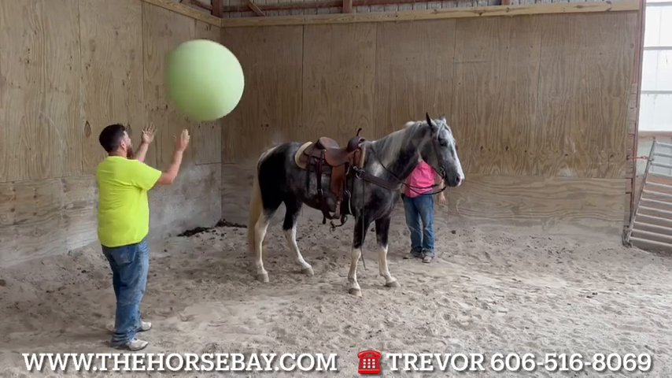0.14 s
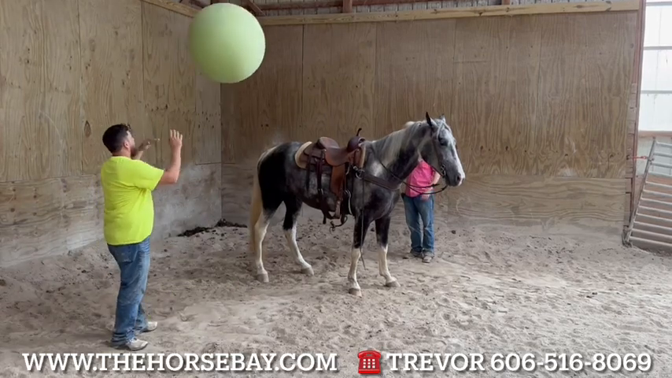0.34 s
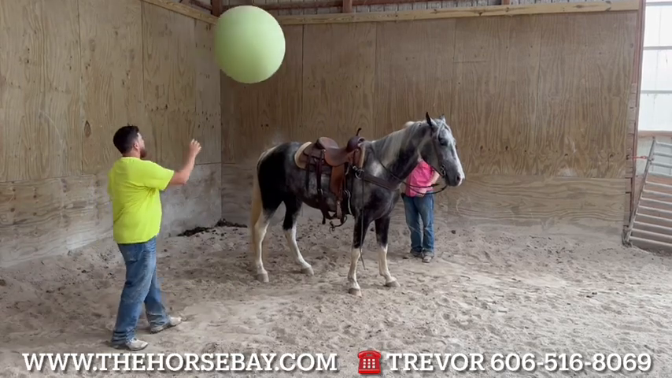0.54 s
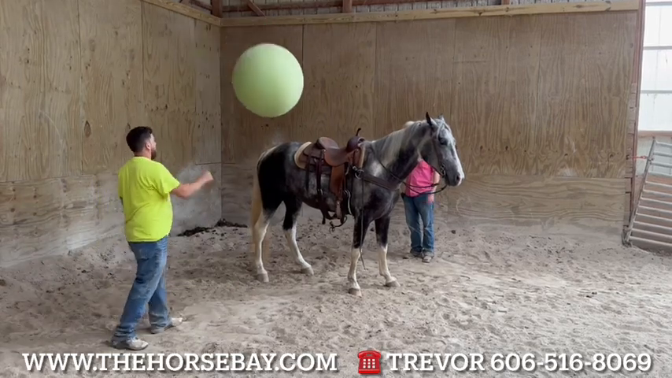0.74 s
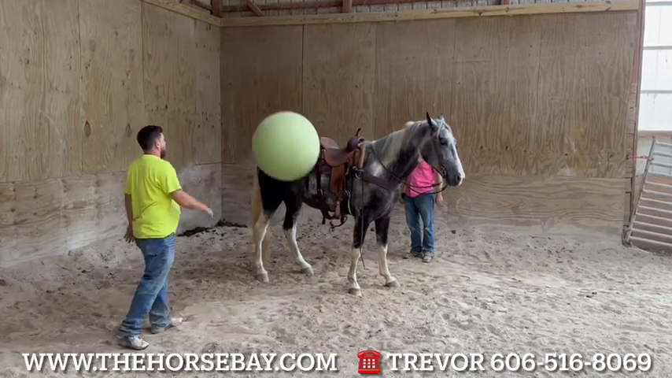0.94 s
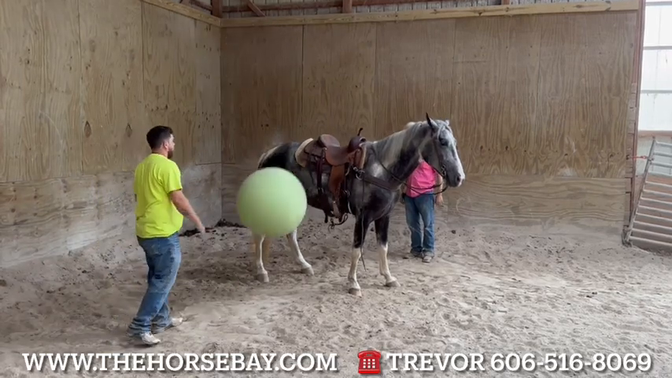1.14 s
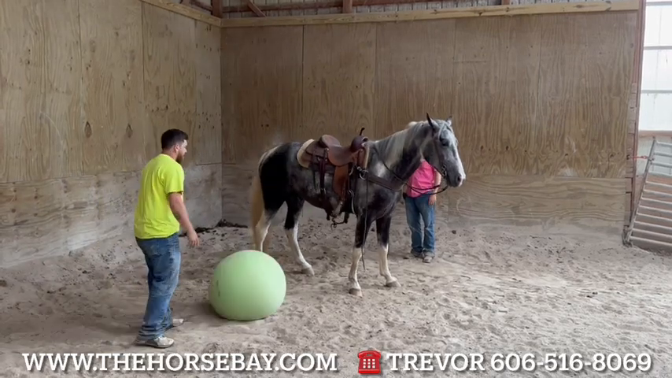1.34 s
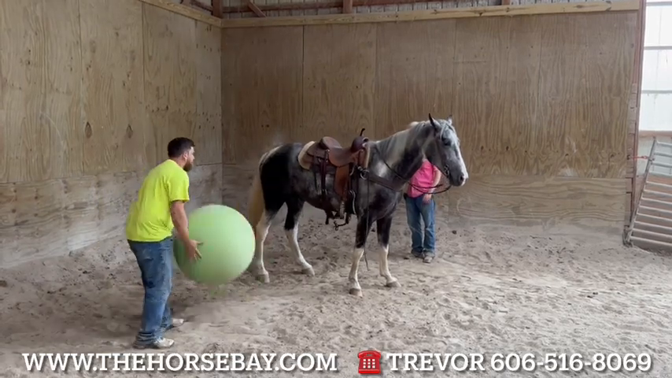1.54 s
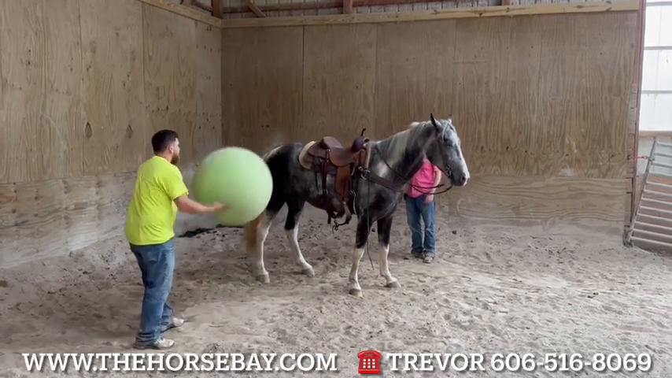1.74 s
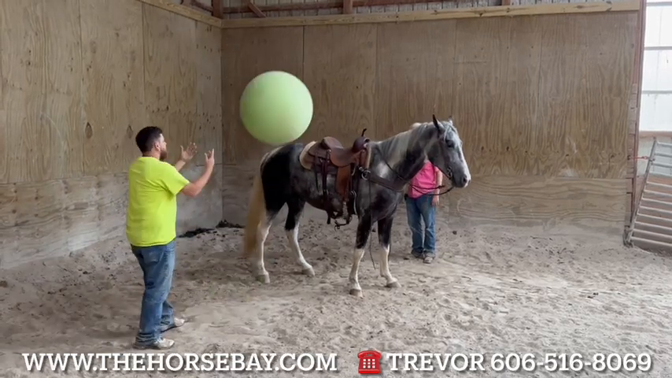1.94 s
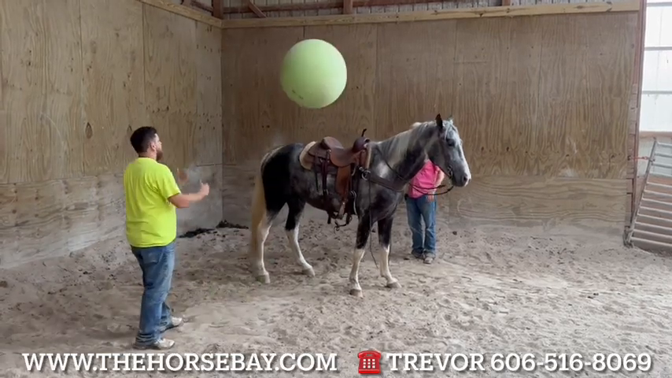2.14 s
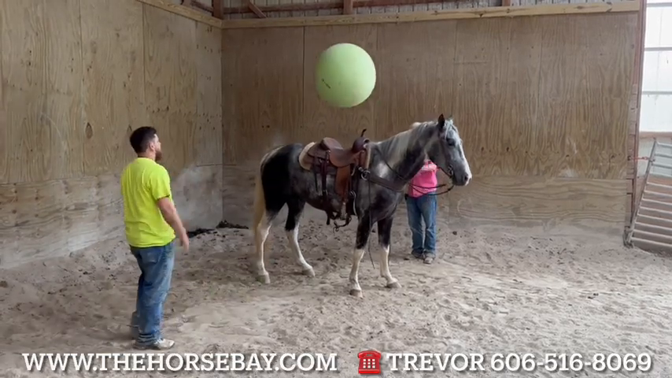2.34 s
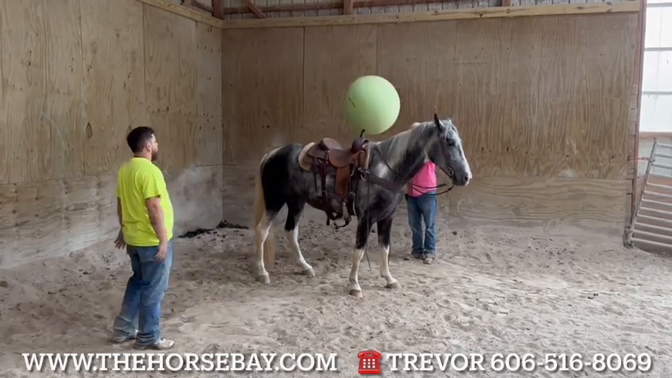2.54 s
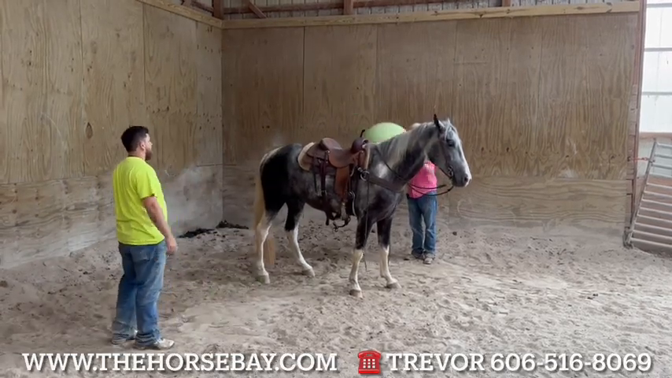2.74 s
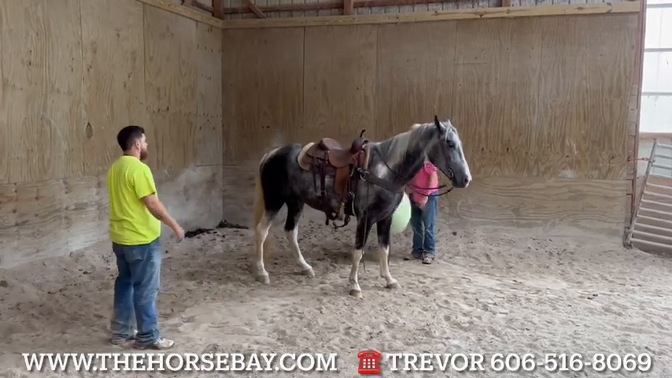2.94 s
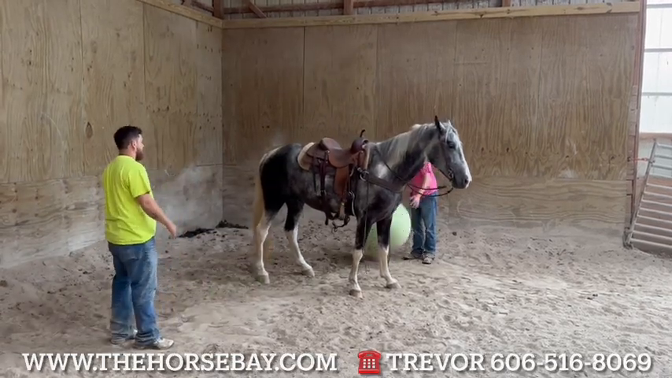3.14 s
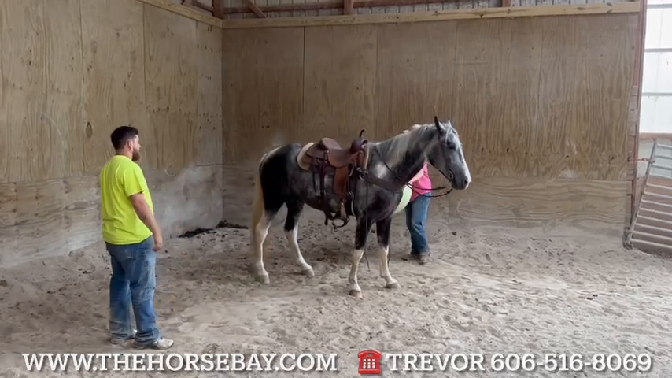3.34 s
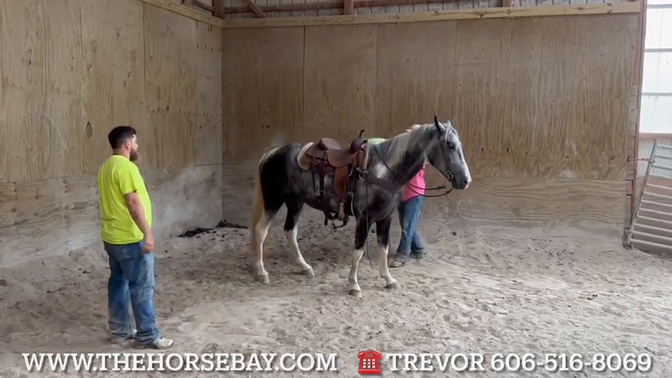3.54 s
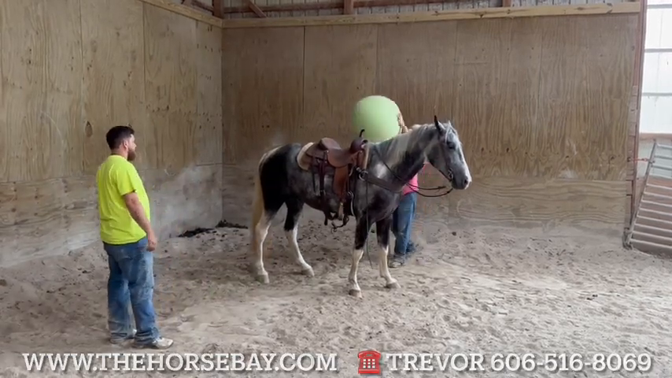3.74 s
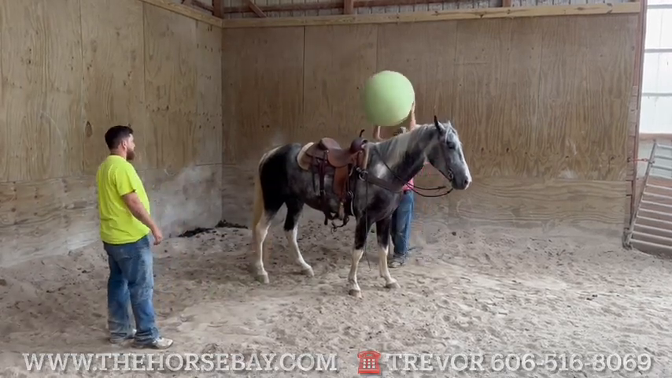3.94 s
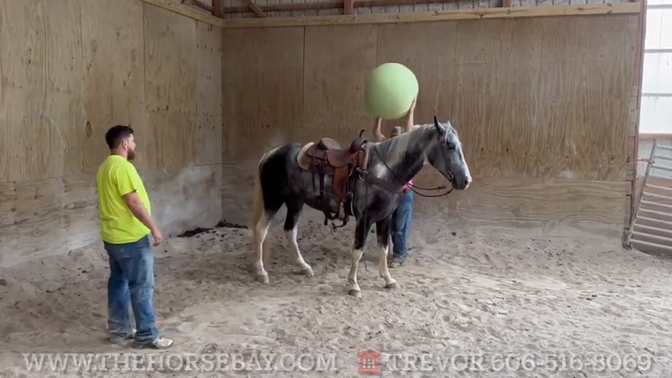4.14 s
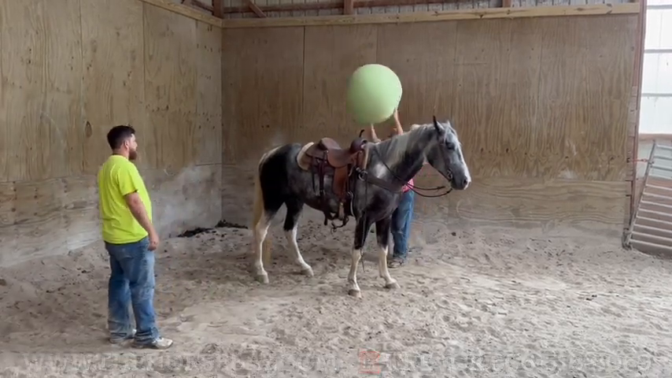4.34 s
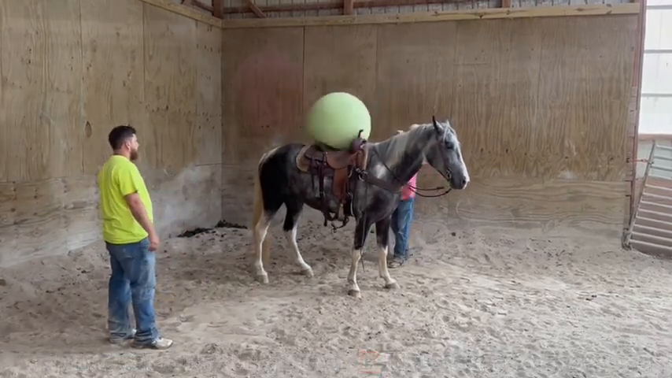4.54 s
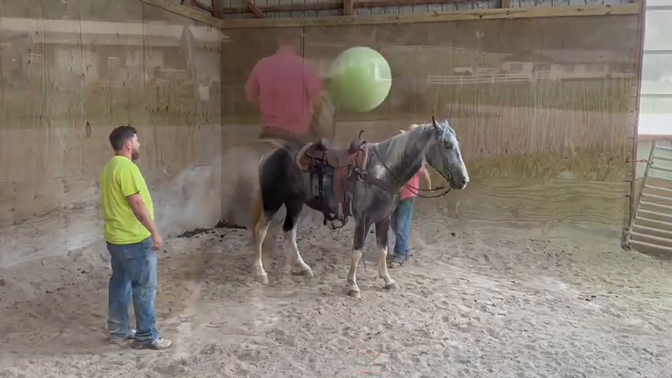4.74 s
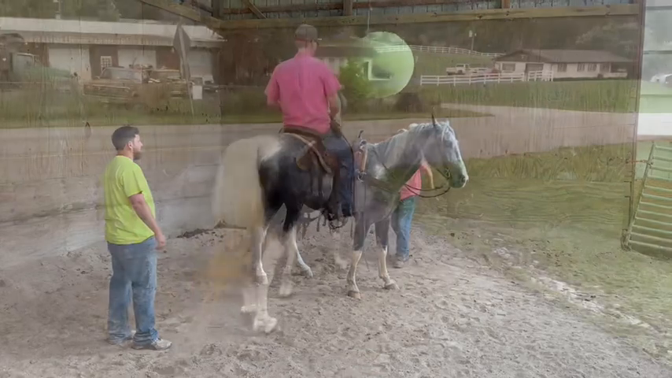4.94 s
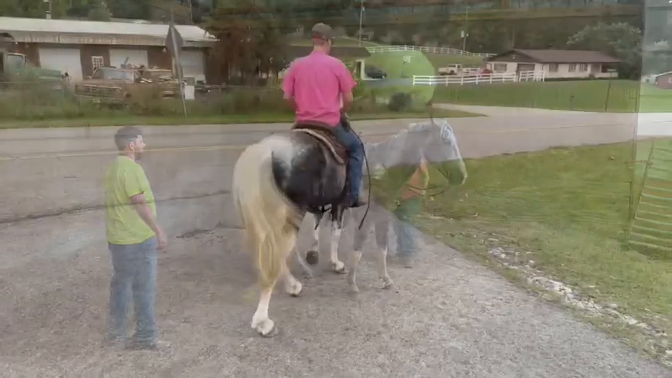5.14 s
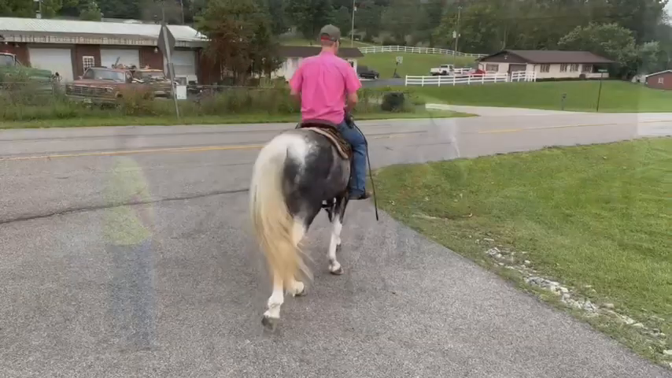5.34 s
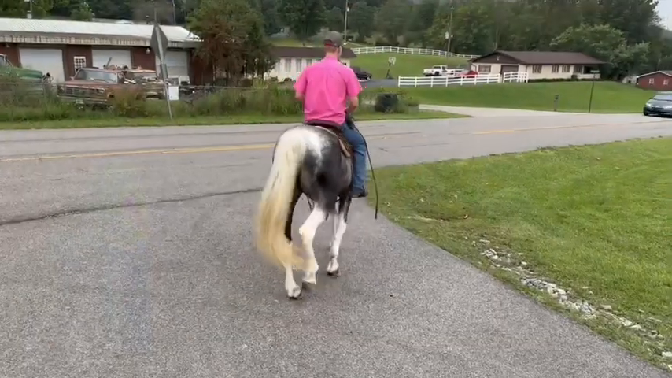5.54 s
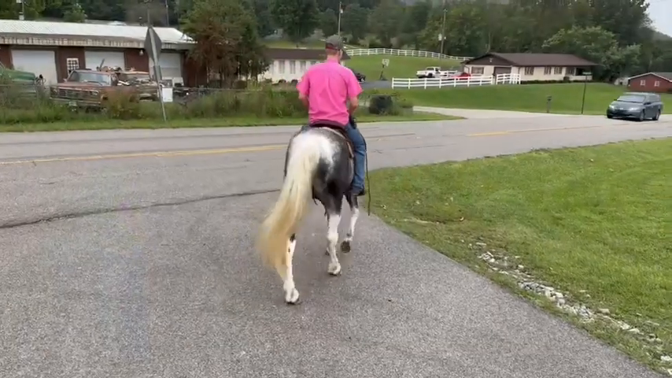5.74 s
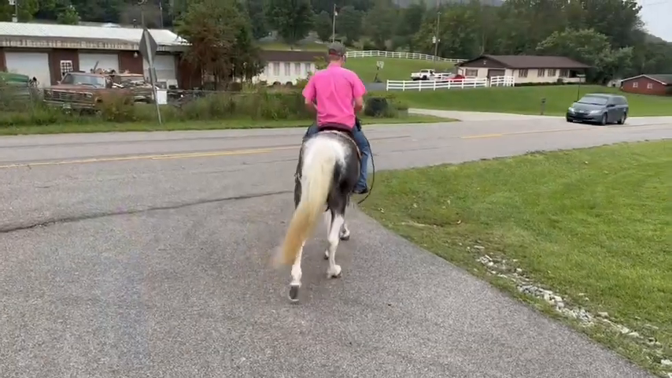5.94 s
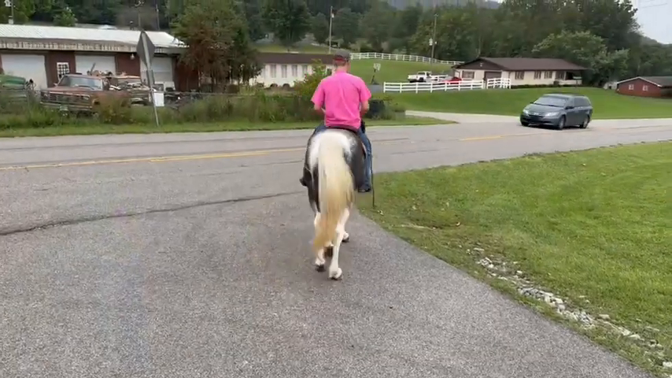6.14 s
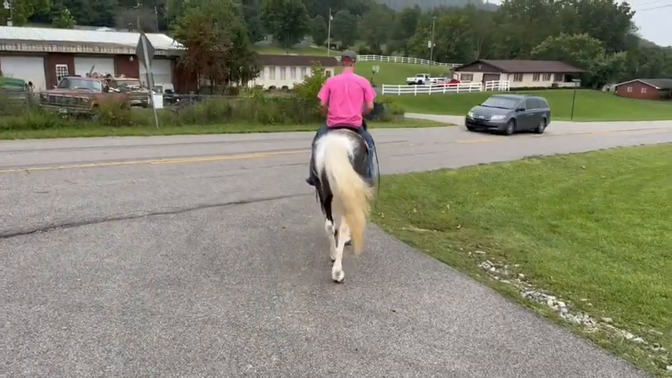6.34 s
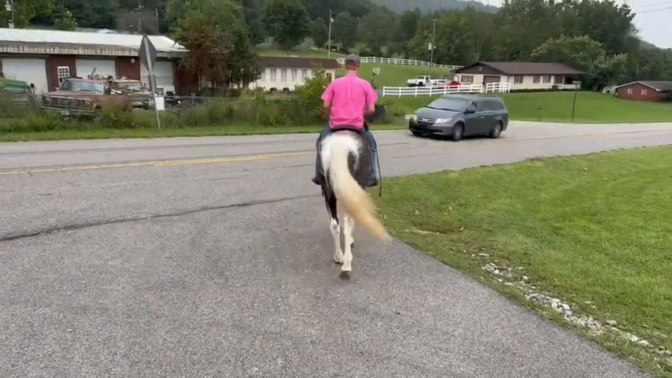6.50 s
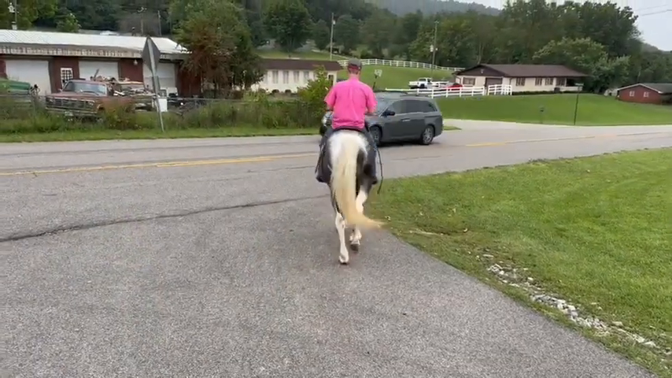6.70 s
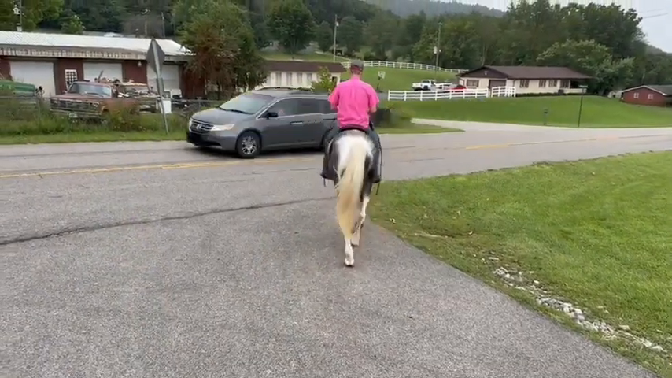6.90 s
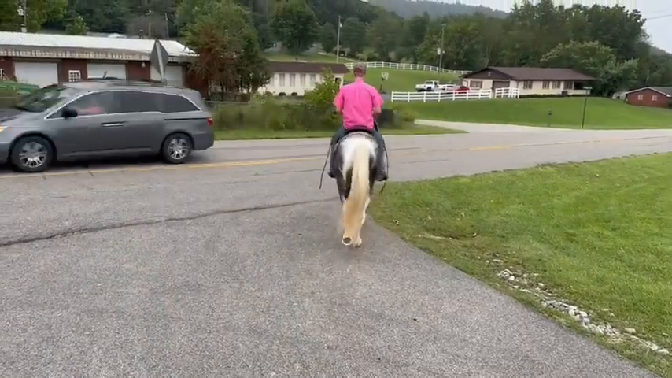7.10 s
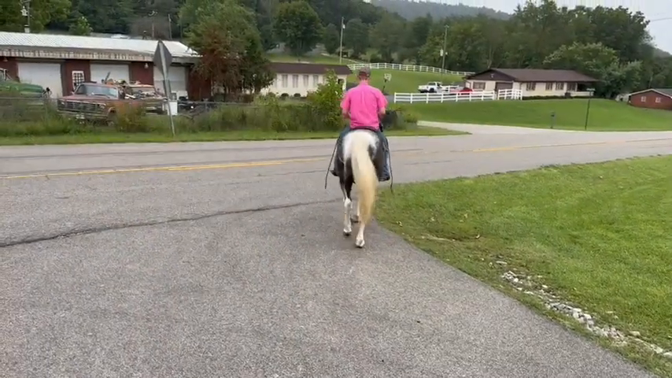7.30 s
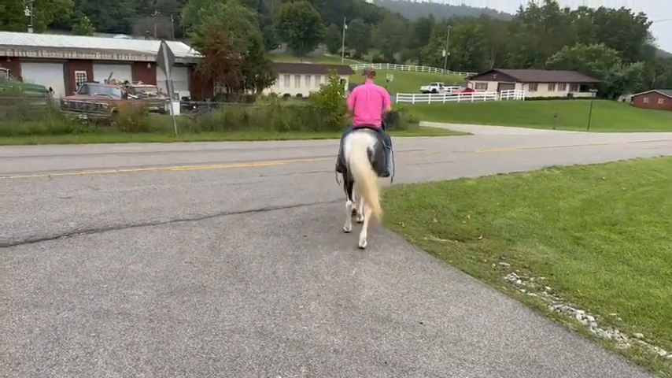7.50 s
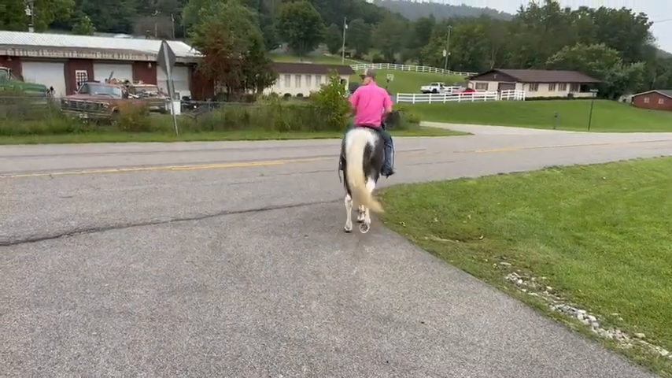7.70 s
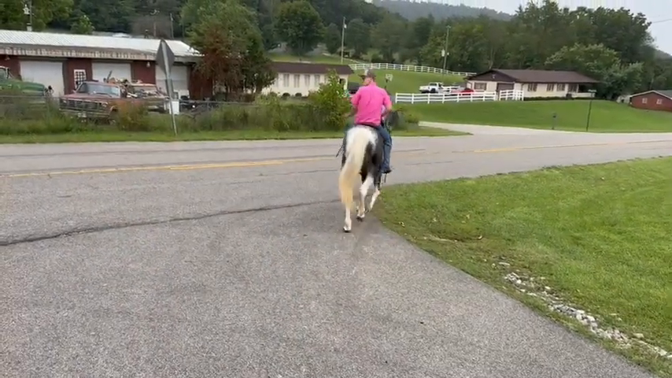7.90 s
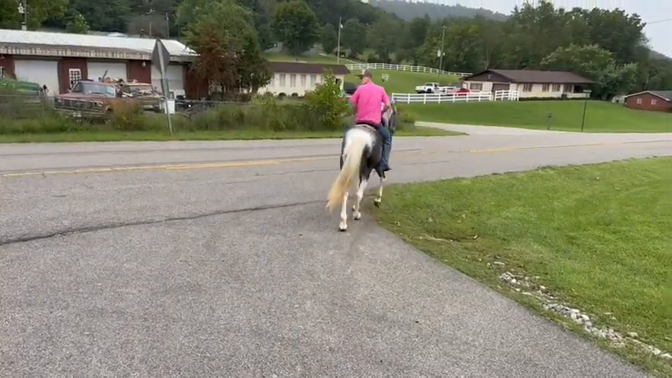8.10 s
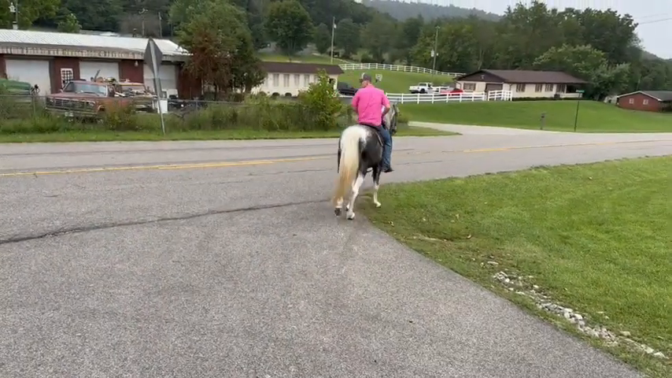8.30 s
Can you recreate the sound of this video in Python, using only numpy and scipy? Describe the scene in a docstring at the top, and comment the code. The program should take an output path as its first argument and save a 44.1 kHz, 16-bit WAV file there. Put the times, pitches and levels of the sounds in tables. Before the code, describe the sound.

A big inflatable ball thumps hollowly around an echoing wooden barn, then hooves clop on asphalt as a van rushes past from right to left.

```python
"""Ball play in a riding barn, then a van on the road

A big inflatable ball bounces off a horse, a sand floor and two pairs of hands in a plywood riding barn:
bending tones and noise make its skin, decaying sines its hollow ring, and a noise tail the barn.
The barn fades into a roadside of steady noise, where hooves knock, crush grit and scrape on asphalt,
low bumps thud at the microphone, and a minivan's filtered noise rushes past from right to left."""
import sys
import numpy as np
from scipy import signal
from scipy.fft import rfft, irfft
from scipy.io import wavfile
from scipy.ndimage import uniform_filter1d

SR = 44100
rng = np.random.default_rng(int(sys.argv[2]) if len(sys.argv) > 2 else 0)


def store_pcm(level_fs):
    """Save levels as 16-bit WAV."""
    pcm = np.round(np.clip(level_fs, -1, 1) * 32767).astype(np.int16)
    wavfile.write(sys.argv[1], SR, np.atleast_2d(pcm).T)


N = 373086
T = np.arange(N) / SR
FRAME, HOP = 1024, 256  # spectral frames (samples)
HZ = np.fft.rfftfreq(FRAME, 1 / SR)
FRAME_S = np.arange(N // HOP + 5)[:, None] * HOP / SR

# diffuse air at the two microphone ports:
# (frequency [Hz], left minus right [dB], phase lead of left [rad], coherence [0-1])
BARN_PORTS = [(65, 1, 0.2, 0.95), (150, 2, 0.3, 0.85), (420, 3, 0.1, 0.66), (600, 1, 0.5, 0.4),
              (950, 4, 2.1, 0.42), (1400, -1, 3, 0.16), (2100, 7, 6.8, 0.24), (7000, 8.5, 7.5, 0.22),
              (10000, 1, 6.3, 0.44)]


def amp(db):
    """Decibels to gain."""
    return 10 ** (np.asarray(db) / 20)


def evened(x):
    """Scales to rms 1."""
    return x / np.sqrt(np.mean(x ** 2) + 1e-20)


def by_hz(table, hz):
    """Every column of a table, read on a log-frequency axis."""
    f, *columns = np.transpose(table)
    return np.array([np.interp(np.log(hz + 1), np.log(f + 1), c) for c in columns])


def add(mix, s, sound):
    """Mixes a sound in at time s, cut off at the end of the mix."""
    part = mix[..., max(round(s * SR), 0):][..., :sound.shape[-1]]
    part += sound[..., :part.shape[-1]]


def tilted(spectrum, hz, tilt_db):
    """A spectrum as gains, tilted by dB per octave between 200 and 4000 Hz."""
    return amp(by_hz(spectrum, hz)[0] + tilt_db * np.log2(np.clip(hz, 200, 4000)))


def noise(spectrum, size, tilt_db=0):
    """Random-phase noise of rms 1 with the given spectrum and tilt."""
    hz = np.fft.rfftfreq(size, 1 / SR)
    phases = np.exp(2j * np.pi * rng.random(len(hz)))
    return evened(irfft(tilted(spectrum, hz, tilt_db) * phases, size))


def pulse(spectrum, size, tilt_db):
    """A causal pressure pulse of energy 1: minimum phase, built by folding the cepstrum."""
    hz = np.fft.rfftfreq(size, 1 / SR)
    log_gain = np.log(tilted(spectrum, hz, tilt_db))
    cepstrum = irfft(log_gain, size) * 2 * (np.arange(size) < size // 2)
    wave = irfft(np.exp(rfft(cepstrum)), size)
    return wave / np.linalg.norm(wave)


def spread(x, pan_db):
    """Places a sound between the ears by level; positive is left."""
    return x * amp([[pan_db / 2], [-pan_db / 2]])


def field(gain, pan_db, phase, same):
    """Noise as the two ports hear it; gain is frames x bins, and gain 1 everywhere gives rms 1."""
    a, b, c, d = rng.standard_normal((4, len(gain), len(HZ)))
    same = np.clip(same, 0, 1)
    left = a + 1j * b
    right = same * left + np.sqrt(1 - same ** 2) * (c + 1j * d)
    right = right * np.exp(-1j * phase)
    share = 1 / (1 + amp(-2 * pan_db))  # left's part of the power
    z = gain * np.array([left * np.sqrt(share), right * np.sqrt(1 - share)])
    sound = signal.istft(z.swapaxes(1, 2), nperseg=FRAME, noverlap=FRAME - HOP)[1]
    return sound[:, :N] * np.sqrt(6 / FRAME)


def shaped(db):
    """A spectrum as gains of mean power 1 in each frame."""
    return amp(db) / np.sqrt(np.mean(amp(2 * db), -1, keepdims=True))


def swells(table, t):
    """A smooth rise and fall for each row (middle [s], level [dB], half length [s]), summed as a gain."""
    return sum(amp(db) * np.exp(-((t - s) / half) ** 2 / 2) for s, db, half in table)


def still_air(spectrum, level_db):
    """The steady, diffuse hush of a place: noise shared loosely between the ports."""
    gain = shaped(by_hz(spectrum, HZ)[0]) * amp(level_db) * np.ones_like(FRAME_S)
    return field(gain, *by_hz(BARN_PORTS, HZ))


def barn_tail(build_s=0.028):
    """The diffuse ring of the barn, of energy 1: it builds up, then the treble dies first."""
    # reverberation of the barn: (frequency [Hz], t60 [s])
    barn_t60 = [(80, 0.96), (200, 1.3), (560, 1.09), (1400, 1.17), (3800, 0.59), (12000, 0.29)]
    decay = amp(-60 * FRAME_S[:220] / by_hz(barn_t60, HZ)[0])
    tail = field(decay, *by_hz(BARN_PORTS, HZ))
    tail = tail * (1 - np.exp(-(T[:tail.shape[1]] / build_s) ** 2))
    return tail / np.sqrt(np.sum(tail ** 2) / 2)


def hollow_ring(t, tilt_db):
    """Decaying hollow modes of the ball, tilted like the slap; the lowest perhaps its skin or the room."""
    # hollow ringing modes: (frequency [Hz], level [dB], t60 [s])
    modes = [(207, -1.5, 0.084), (389.5, -0.5, 0.13), (589, -7.5, 0.13), (780, -6, 0.12),
             (945, -13.5, 0.16), (1130, -31, 0.1), (1290, -26, 0.13), (1420, -22, 0.13), (1620, -27, 0.1)]
    ring = np.zeros(len(t))
    for hz, db, t60 in modes:
        octaves = np.log2(hz / modes[1][0])
        ring += amp(db + tilt_db * octaves - 60 * t / t60) * np.sin(2 * np.pi * hz * t)
    return ring


def skin_heave(t, thump_db, start_hz, end_hz, squash_s, ragged=0.59):
    """The thump: the skin heaves as a sine of falling pitch, roughened by uneven noise."""
    # uneven heaving: (multiple of the thump's last frequency [ratio], relative level [dB per Hz])
    heave_spectrum = [(.25, -30), (.6, -9), (1, -2), (1.6, -6.5), (2.6, -20), (6, -35.5), (30, -73)]
    wobble_hz = end_hz * (start_hz / end_hz) ** np.exp(-t / squash_s)  # the skin slackens as it rebounds
    tone = np.sin(2 * np.pi * np.cumsum(wobble_hz) / SR)
    uneven = noise([(end_hz * ratio, db) for ratio, db in heave_spectrum], len(t))
    wobble = tone * (1 - ragged / 2) + ragged * uneven
    squash = (t / squash_s) ** 2 * np.exp(2 - 2 * t / squash_s)  # peaks at 1 when flattest
    return amp(thump_db) * squash * wobble


def contact(thump_db, start_hz, end_hz, squash_s, slap_db, tilt_db, rise_s, ring_db, tick_db,
            slap_t60=0.059, tick_t60=0.0095, fizz_db=-16, fizz_t60=0.18,
            crack_db=16, flap_db=-4, room_crack_db=24, room_ring_db=-3):
    """One blow: skin cracks, flaps, heaves and ticks over a hollow ring. Returns body, tick, room feed."""
    # slap of the skin: (frequency [Hz], relative level [dB per Hz])
    slap_spectrum = [(30, -29), (70, 14), (180, 4), (270, -3), (450, -1), (850, 5.5), (1300, -2),
                     (2100, -11.5), (3400, -18.5), (6000, -32), (16000, -45)]
    # fine tick of the skin: (frequency [Hz], relative level [dB per Hz])
    skin_spectrum = [(300, -25), (1200, 14), (2200, -1), (4000, 3.5), (6500, 2), (9500, -4), (12000, -14),
                     (16000, -11)]
    t = T[:SR // 2]
    heave = skin_heave(t, thump_db, start_hz, end_hz, squash_s)
    ring = amp(ring_db) * hollow_ring(t, tilt_db)
    touch = 1 - np.exp(-(t / rise_s) ** 2)  # the contact patch takes a moment to spread
    crack = pulse(slap_spectrum, len(t), tilt_db)
    flap = noise(slap_spectrum, len(t), tilt_db) * amp(flap_db - 60 * t / slap_t60)
    tick_decay = amp(-60 * t / tick_t60) + amp(fizz_db - 60 * t / fizz_t60)
    tick = np.array([noise(skin_spectrum, len(t)) for _ in range(2)]) * tick_decay
    tick = amp(tick_db) * tick * touch
    body = heave + amp(slap_db) * (amp(crack_db) * crack + (flap + ring) * touch)
    room_slap = amp(room_crack_db) * crack + amp(room_ring_db) * ring * touch
    return body, tick, heave + amp(slap_db) * room_slap


def smack(db, low_hz, high_hz, peak_s, top_db=-6):
    """A short noise burst in one band, strongest at peak_s."""
    u = T[:SR // 10] / peak_s
    band = [(low_hz / 2, -30), (low_hz, 0), (high_hz, top_db), (high_hz * 1.55, -40), (high_hz * 2, -90)]
    return amp(db) * noise(band, len(u)) * u * np.exp((1 - u ** 2) / 2)


def in_barn(sound, room_db):
    """The barn's answer to a sound: its convolution with a fresh noise tail."""
    return amp(room_db) * signal.fftconvolve(sound[None], barn_tail(), axes=1)


def ball(pan_db=3.0, tick_pan_db=2, tick_echo_db=-10, bright_hz=2000, room_tick_db=3,
         firm_rise_s=0.00041, firm_db=-25, rise_halving_db=8, far_wall_s=0.081, far_wall_db=-9.5):
    """Each contact arrives directly, off the nearby and far walls, and as the ring of the barn."""
    # ball contacts: (time [s], thump [dB], thump's first frequency [Hz], thump's last frequency [Hz],
    # time to flattest squash [s], slap [dB], slap tilt [dB per octave], hollow ring over the slap [dB],
    # skin tick [dB], wall distance [factor], room [dB])
    contacts = [(0.02, -47.5, 175, 145, 0.007, -55, -4, -10, -74, 1.1, 2),
                (0.938, -38.5, 190, 115, 0.013, -36.5, -1.5, -2, -36.5, 1.02, -3.5),
                (0.966, -33.5, 364, 78, 0.015, -36, -5, -3.5, -66, 0.8, -7),
                (1.316, -25, 198, 164, 0.0082, -28.5, 3, -1, -34, 1.43, -2.5),
                (1.318, -20, 110, 80, 0.0046, -44, -3, -12, -64, 0.81, -14),
                (1.338, -16, 386, 224, 0.002, -30.5, 0.5, -11, -48, 0.55, -8.5),
                (1.557, -23, 119, 85.5, 0.01, -42, 4, -6, -37, .75, -13),
                (1.720, -39.5, 161, 130, 0.01, -53, 1, -4, -64, 1.24, -3.5),
                (2.658, -39, 164, 129, 0.0058, -47, -6, -11, -37, 1.14, -2),
                (2.941, -42.5, 130, 95, 0.0084, -46, -6.5, -8, -64, 1.27, -15),
                (3.027, -25.5, 490, 225, 0.0066, -21.5, -1.5, -2.5, -37.5, 1.12, -4),
                (3.032, -21.5, 110, 89.4, 0.0088, -28, -2.5, -17, -56, 0.62, -2.5),
                (4.391, -33, 300, 222, 0.0036, -56, 11, -2, -64, 0.55, -5),
                (4.409, -28.5, 187, 142, 0.0091, -50, -5, -1.5, -64, 0.64, -11.5),
                (4.472, -26, 100, 78.5, 0.013, -30.5, 0, -10, -25.5, 2.1, -6)]
    # early echoes off floor and walls: (delay at wall distance 1 [s], level [dB])
    echoes = [(.0075, -5.5), (0.011, -2.5), (0.017, -3.5), (0.024, -4.5), (0.0315, -20)]
    # short bursts in one band: the vinyl smacks as it flattens and peels away, and between 4.48 and 4.52 s the
    # saddle's tack rattles: # (time [s], level [dB], low edge [Hz], high edge [Hz], time to peak [s], room
    # [dB])
    smack_rows = [(0.941, -44, 420, 1200, 0.015, -6), (0.965, -31, 300, 510, 0.0047, -11),
                  (1.3156, -22, 782.5, 1340, 0.003, -7.5), (1.3165, -31, 1950, 3400, 0.0024, -13),
                  (1.326, -37.5, 1000, 5000, 0.0021, -11), (1.338, -37, 700, 1030, 0.0064, -13),
                  (3.027, -20, 453, 770, 0.0056, -5), (3.030, -47.5, 2470, 5000, 0.014, 0),
                  (3.042, -39, 1470, 2090, 0.012, -2), (4.470, -28.5, 1000, 2290, 0.0013, -6.5),
                  (4.469, -30, 3540, 8000, 0.0011, -4), (4.470, -29, 222, 424, 0.0025, -12),
                  (4.481, -45, 3500, 9250, .005, -5), (4.508, -37.5, 2200, 6500, 0.00097, -6),
                  (4.505, -34, 384, 500, .006, -9), (4.519, -46, 1500, 6500, 0.0066, -7),
                  (4.63, -37.5, 860, 1200, 0.0021, -9)]
    out = np.zeros((2, N))
    dull = signal.butter(2, bright_hz, fs=SR, output="sos")
    for (s, thump_db, start_hz, end_hz, squash_s, slap_db, tilt_db,
         ring_db, tick_db, walls, room_db) in contacts:
        rise_s = firm_rise_s * 2 ** ((firm_db - slap_db) / rise_halving_db)  # harder slaps rise faster
        body, tick, outward = contact(thump_db, start_hz, end_hz, squash_s, slap_db, tilt_db,
                                      rise_s, ring_db, tick_db)
        add(out, s, spread(body, pan_db) + spread(tick, tick_pan_db))
        reflected = signal.sosfilt(dull, body)  # sand and plywood swallow the top of the slap
        for delay, db in echoes:
            echo = reflected + amp(tick_echo_db) * tick
            add(out, s + delay * walls, amp(db) * spread(echo, pan_db))
        add(out, s + far_wall_s, amp(far_wall_db) * spread(reflected, pan_db))
        outward = signal.sosfilt(dull, outward) + amp(room_tick_db) * tick[0]
        add(out, s, in_barn(outward, room_db))
    for s, *shape, room_db in smack_rows:
        burst = smack(*shape)
        add(out, s, spread(burst, pan_db))
        add(out, s, in_barn(burst, room_db))
    return out


def rubbing(grain_db=3):
    """Hands and sleeves slide over the vinyl: a faint hiss whose level jitters like grain."""
    # strokes: (middle [s], level [dB], half length [s])
    strokes = [(1.61, -72, 0.034), (1.75, -72, 0.043), (2.69, -63.5, 0.02), (2.85, -74, 0.14),
               (3.6, -69, 0.07), (3.85, -66.5, 0.092), (4.38, -69.5, 0.15), (4.62, -70.5, 0.076)]
    grain = amp(grain_db * evened(uniform_filter1d(rng.standard_normal(N), size=200)))
    hiss = noise([(2000, -25), (6000, 12.5), (9500, 7.5), (15000, 3)], N)
    return spread(evened(hiss * grain) * swells(strokes, T), 1.5)


def bell(hz, width):
    """A smooth bump of height 1 along the frequency axis."""
    return np.exp(-((HZ - hz) / width) ** 2)


def above(hz):
    """A smooth step from 0 to 1 along the frequency axis."""
    return 1 / (1 + (hz / (HZ + 1)) ** 4)


def patches(frames_size, bins_size):
    """Random patches of rms 1 drifting over time and frequency."""
    z = rng.standard_normal((len(FRAME_S), len(HZ)))
    return evened(uniform_filter1d(uniform_filter1d(z, frames_size, 0), bins_size, 1))


def doublings(t, lag_s=0, loudest_s=7.15, loud_time=0.66):
    """How many times the van's distance has doubled, counted from its loudest, just after passing."""
    return np.log2(np.hypot((t - loudest_s - lag_s) / loud_time, 1))


def tyre_roar(along, nearness, behind, mach=0.077, arrive_s=6.9, arrive_time=0.34,
              roar_db=-20.5, roar_fall_db=8.5, treble_db=0, treble_fall_db=4.5, treble_hz=2600, low_hz=210,
              hollow_db=-2.5, hollow_width_hz=100, patchy_db=1.5, flutter_db=0.68):
    """Tyre noise blends from ahead, side and behind; Doppler slides its spectrum down.

    Falls are in dB per doubling of distance; mach is speed over the speed of sound."""
    # tyre spectra from ahead, the side and behind: (frequency [Hz], relative level [dB per Hz])
    coming = [(260, -6.5), (450, -18), (600, -8.5), (720, -4.5), (870, 1), (1030, -7), (1180, -5),
              (1400, 0), (1650, -12), (2100, -18), (3000, -25.5), (4500, -34.5), (7000, -37),
              (14000, -47.5)]
    abeam = [(260, -12), (450, -14), (600, -10.5), (720, 1), (870, -3), (1030, -3), (1180, -15), (1400, -4),
             (1650, -17), (2100, -29), (3000, -26.5), (4500, -36.5), (7000, -51.5), (14000, -58)]
    going = [(260, -13), (450, -13), (600, -7.5), (720, -1.5), (870, 1.5), (1030, -5.5), (1180, -7.5),
             (1400, -8), (1650, -7.5), (2100, -17), (3000, -28), (4500, -33.5), (7000, -51), (14000, -57)]
    # tyres at the two ports from ahead, the side and behind:
    # (frequency [Hz], left minus right [dB], phase lead of left [rad], coherence [0-1])
    coming_ports = [(250, 3, -0.3, 0.98), (600, -2, -0.2, 0.98), (900, -1, -0.4, 0.98),
                    (1200, -6, 0.3, 0.98), (1420, -2, 0.7, 0.98), (1600, -1, 2.7, 0.41),
                    (1800, 4, 5.5, 0.55), (2300, 4, 5.6, 0.71), (3200, 3, 6.8, 0.76), (6700, 2, 7.0, 0.46),
                    (14000, 0, 6.1, 0.63)]
    abeam_ports = [(250, 3, 0.1, 0.98), (600, 3, 0.5, 0.98), (900, 0, 0.4, 0.91), (1200, -1, 1.2, 0.89),
                   (1420, -2, 1.5, 0.91), (1600, -4, 3.1, 0.69), (1800, -2, 4.3, 0.88),
                   (2300, 1, 5.9, 0.86), (3200, 3, 7.0, 0.8), (6700, 2, 7.1, 0.48), (14000, 0, 6.0, 0.49)]
    going_ports = [(250, 4, 0.9, 0.98), (600, 4, 1.9, 0.98), (900, 0, 1.9, 0.97), (1200, -3, 2.3, 0.94),
                   (1420, -7, 3.1, 0.73), (1600, -5, 5.8, 0.86), (1800, -3, 6.3, 0.96),
                   (2300, 0, 6.9, 0.85), (3200, 5, 8.6, 0.64), (6700, 2, 7.4, 0.27), (14000, 0, 6.2, 0.78)]
    # a narrow hollow in the roar slides down as the van passes: (time [s], frequency [Hz])
    hollow = [(5.0, 1830), (6.0, 1560), (6.6, 1600), (7.1, 1600), (7.3, 1440), (7.5, 1280), (7.9, 1360)]
    # one band of the roar swells and fades:
    # (middle [s], half length [s], level [dB], frequency [Hz], half width [Hz], glide [Hz/s])
    flares = [(6.104, 0.16, 7, 1340, 121, -9), (6.545, 0.19, 6.5, 1200, 180, -9),
              (6.547, 0.049, 5.5, 890, 140, 11), (6.77, 0.14, 8, 447, 120, 7),
              (7.45, 0.15, 5, 880, 110, 300), (7.7, 0.18, 8, 380, 110, 0),
              (7.763, 0.18, 10, 1115, 138, 800), (8.373, 0.17, 7, 970, 131, -4)]
    heard_hz = HZ * (1 + mach * along * nearness)  # the frequency each bin had at the van
    ahead = .5 - .5 * np.tanh((FRAME_S - arrive_s) / arrive_time)
    shares = ahead, 1 - ahead - behind, behind
    db = sum(share * by_hz(table, heard_hz)[0]
             for share, table in zip(shares, (coming, abeam, going)))
    ports = sum(share * by_hz(table, heard_hz)
                for share, table in zip(shares, (coming_ports, abeam_ports, going_ports)))
    far = doublings(FRAME_S)
    db = db + (treble_db - treble_fall_db * far) * above(treble_hz)  # on top of the roar
    db = db + 10 * np.log10(above(low_hz))
    db = db + hollow_db * bell(np.interp(FRAME_S, *np.transpose(hollow)), hollow_width_hz)
    level_db = roar_db - roar_fall_db * far
    for s, half, rise_db, hz, width, glide in flares:
        swell = np.exp(-((FRAME_S - s) / half) ** 2)
        level_db = level_db + rise_db * swell * bell(hz + glide * (FRAME_S - s), width)
    # moving air stirs the sound on its way
    stirred_db = patchy_db * patches(10, 6) + flutter_db * patches(8, 120)
    return field(shaped(db) * amp(level_db + stirred_db), *ports)


def body_rumble(along, nearness, behind, body_db=-27.5, body_fall_db=11.5, lag_s=-0.025,
                exhaust_db=8, exhaust_hz=176, exhaust_width_hz=67,
                pan_db=2.0, port_delay_s=0.0009, same=0.96):
    """Low noise of the van's body, with the tailpipe's drone raised once it is heard from behind."""
    # body rumble: (frequency [Hz], relative level [dB per Hz])
    rumble = [(20, -43), (40, -25), (70, 5), (110, -6.5), (170, -5.5), (280, -8), (450, -20), (900, -35),
              (3000, -80)]
    gain = shaped(by_hz(rumble, HZ)[0]) * amp(body_db - body_fall_db * doublings(FRAME_S, lag_s))
    gain = gain * amp(exhaust_db * behind ** 2 * bell(exhaust_hz, exhaust_width_hz))
    # the left port hears it first once it has passed
    lead = 2 * np.pi * HZ * port_delay_s * along * nearness
    return field(gain, pan_db, lead, same)


def air_rush(rush_db=-41, rush_s=7.25, rush_time=0.32):
    """Fine hiss of tyres and slipstream that only carries when the van is close."""
    hiss = [(800, -17), (2300, 10.5), (3200, -12.5), (4500, -4.5), (7000, -5),
            (8200, -17), (9600, -6.5), (12000, -21.5), (15500, -23)]
    closeness = 1 / (1 + ((T - rush_s) / rush_time) ** 2)
    at_ports = noise(hiss, N) + np.array([noise(hiss, N) for _ in range(2)])
    return amp(rush_db) * closeness * evened(at_ports)


def minivan(pass_s=6.68, pass_time=1, leave_s=7.424, leave_time=0.26):
    """The van drives a straight line, nearest at pass_s; pass_time is nearest distance over speed (s)."""
    along = (FRAME_S - pass_s) / pass_time
    nearness = 1 / np.hypot(along, 1)
    behind = .5 + .5 * np.tanh((FRAME_S - leave_s) / leave_time)
    return tyre_roar(along, nearness, behind) + body_rumble(along, nearness, behind) + air_rush()


def hooves(clop_t60=0.11, grit_t60=0.053, scuff_db=-14, scuff_t60=0.25, grain_db=4, scrape_t60=0.13,
           rise_s=0.00049):
    """Each hoof knocks on the asphalt, snaps and crushes a little grit, and scrapes briefly."""
    # hoof falls and scuffs: (time [s], clop [dB], grit [dB], scrape [dB])
    falls = [(4.838, -47, -53, -54), (4.866, -45, -55, -58), (5.168, -46, -48.5, -56),
             (5.2005, -26.5, -40, -47), (5.235, -48, -49, -64), (5.566, -50, -46, -64),
             (5.787, -51, -51, -52), (5.824, -23, -38, -49), (5.976, -36, -42.5, -61),
             (6.016, -28, -45, -61), (6.343, -23, -65, -57), (6.383, -23.5, -65, -60),
             (7.492, -24, -56, -48), (7.516, -45, -39, -48), (8.056, -50, -46, -66), (8.085, -48, -46, -68)]
    # knock, crushed grit and sliding hoof: (frequency [Hz], relative level [dB per Hz])
    clop_spectrum = [(100, -38), (400, -17), (750, 7.5), (1300, -4), (2000, -19), (5000, -32), (16000, -61)]
    grit_spectrum = [(500, -29), (2000, 7), (3700, 4), (6000, -6), (9500, -8), (12000, -15), (16000, -18)]
    scrape_spectrum = [(1000, -28), (2300, -12), (3000, 5), (3550, -5), (4100, -10), (4800, 6), (6000, -46),
                       (16000, -48)]
    out = np.zeros((2, N))
    t = T[:SR // 4]
    for s, clop_db, grit_db, scrape_db in falls:
        clop = noise(clop_spectrum, len(t)) * amp(clop_db - 60 * t / clop_t60)
        scrape = noise(scrape_spectrum, len(t)) * amp(scrape_db - 60 * t / scrape_t60)
        jitter = evened(uniform_filter1d(rng.standard_normal(len(t)), size=80))
        grains = evened(amp(grain_db * jitter))
        crush = amp(-60 * t / grit_t60) + grains * amp(scuff_db - 60 * t / scuff_t60)
        snap = noise(grit_spectrum, len(t), -3) * amp(11 - 60 * t / .01)
        grit = snap + crush * np.array([noise(grit_spectrum, len(t)) for _ in range(2)])
        add(out, s, (clop + scrape + amp(grit_db) * grit) * (1 - np.exp(-t / rise_s)))
    return out


def dragging(grains_per_s=800, grain_t60=0.013, pan_db=1):
    """Separate grains of grit crackle under a dragged shoe and make it ring."""
    # drags over loose grit: (middle [s], level [dB], half length [s], lowest ring [Hz])
    drags = [(5.22, -55, 0.014, 4620), (5.857, -60, 0.011, 4800), (6.369, -45, 0.019, 3040),
             (8.095, -46.5, 0.02, 4660)]
    # a horseshoe rung by grit: (multiple of its lowest ring [ratio], relative level [dB per Hz])
    shoe = [(.3, -26), (.75, -9), (1, 10), (1.14, -2), (1.32, 8.5), (1.55, -15), (2.1, -11), (3.2, -23)]
    t = T[:SR // 50]
    out = np.zeros(N)
    for s, db, half, ring_hz in drags:
        colour = [(ring_hz * ratio, level) for ratio, level in shoe]
        crackle = np.zeros(SR // 4)
        for _ in range(8):  # eight different grain sounds
            struck = rng.random(len(crackle)) < grains_per_s / 8 / SR
            clicks = rng.standard_normal(len(crackle)) * struck
            grain = noise(colour, len(t)) * amp(-60 * t / grain_t60)
            crackle += signal.oaconvolve(clicks, grain)[:len(crackle)]
        middle = len(crackle) / SR / 2
        add(out, s - middle, evened(crackle) * swells([(middle, db, half)], T[:len(crackle)]))
    return spread(out, pan_db)


def low_bumps(apart_db=-14):
    """Short low bumps at the microphone, nearly alike at both ports: wind, and perhaps a hoof's thud."""
    # bumps: (middle [s], level [dB], half length [s])
    bumps = [(5.253, -36.5, 0.069), (5.39, -30, 0.025), (5.508, -25, 0.037), (5.6, -27, 0.013),
             (5.798, -30.5, 0.05), (6.028, -32.5, 0.056), (6.192, -17, 0.008), (6.245, -22, 0.014),
             (6.368, -25.5, 0.023), (7.814, -22, 0.0087)]
    # colour of a bump: (frequency [Hz], relative level [dB per Hz])
    bump_spectrum = [(15, -16), (35, -9.5), (55, 10), (90, 0.5), (140, -3.5), (250, -22), (600, -84),
                     (2000, -80)]
    apart = np.array([noise(bump_spectrum, N) for _ in range(2)])
    return swells(bumps, T) * (noise(bump_spectrum, N) + amp(apart_db) * apart)


def stones(ping_t60=0.038, rise_s=0.0013):
    """A stone squeezed out from under a shoe gives one short, high ping: a decaying sine."""
    # pings: (time [s], frequency [Hz], level [dB])
    pings = [(5.826, 4500, -39), (6.323, 4600, -40), (6.383, 3440, -32), (8.086, 6250, -45)]
    out = np.zeros((2, N))
    t = T[:SR // 10]
    for s, hz, db in pings:
        ping = np.sin(2 * np.pi * hz * t) * amp(db - 60 * t / ping_t60)
        add(out, s, ping * (1 - np.exp(-t / rise_s)))
    return out


def scene(dissolve_s=4.625, dissolve_time=0.8, barn_db=-47, roadside_db=-43.5):
    """The barn's air dissolves into the roadside and its van; the separate events lie on top."""
    # steady air of the barn and by the road: (frequency [Hz], relative level [dB per Hz])
    barn = [(22.0, -22), (65.0, 3.5), (150.0, -4), (420.0, -3), (600.0, -5), (950.0, -7), (1400.0, -4),
            (1700.0, -9.5), (2100.0, -14.5), (4000.0, -19.5), (7000.0, -24.5), (8300.0, -35.5),
            (10000.0, -38), (11500, -51), (15000.0, -44)]
    roadside = [(30, -6), (70, 7.5), (400, -7), (1500, 1), (2300, -14.5), (4000, -18), (7000, -14),
                (8300, -34), (9600, -23.5), (11500, -45), (15000, -44)]
    outdoors = np.clip((T - dissolve_s) / dissolve_time, 0, 1)
    steady = (1 - outdoors) * still_air(barn, barn_db)
    steady = steady + outdoors * (still_air(roadside, roadside_db) + minivan())
    return steady + ball() + rubbing() + hooves() + dragging() + low_bumps() + stones()


def record(dry, low_cut_hz=35, edge_hz=15800):
    """The microphone's low cut and the recorder's band limit."""
    low_cut = signal.butter(4, low_cut_hz, "high", fs=SR, output="sos")
    thinned = signal.sosfilt(low_cut, dry)
    band_limit = signal.firwin(511, edge_hz, window=("kaiser", 9), fs=SR)
    return signal.oaconvolve(thinned, band_limit[None], "same")


dry = scene()
out = record(dry)
store_pcm(out)
```